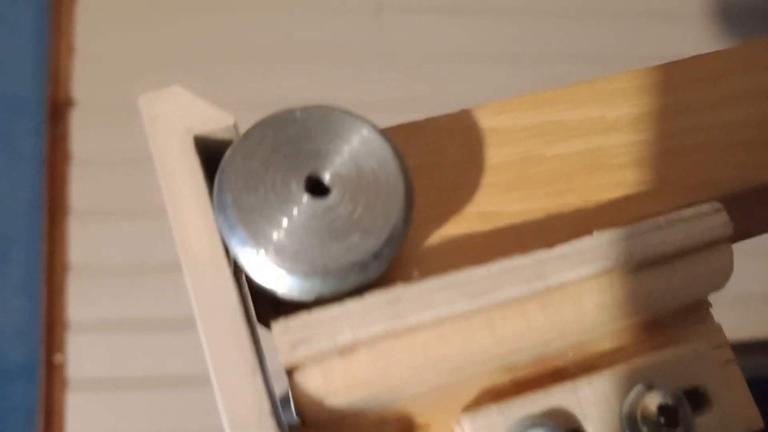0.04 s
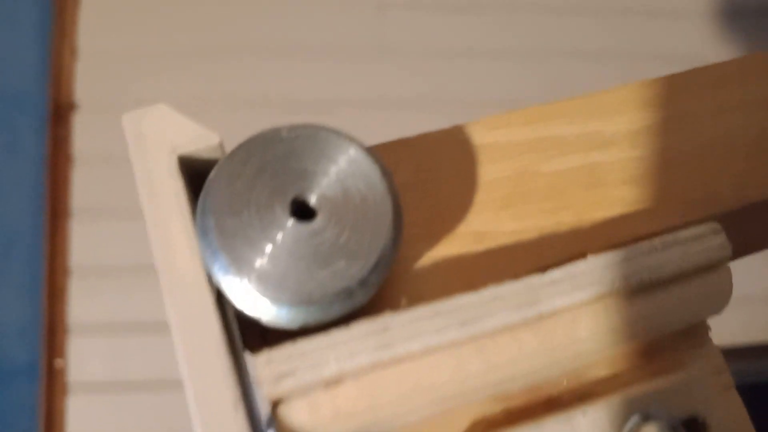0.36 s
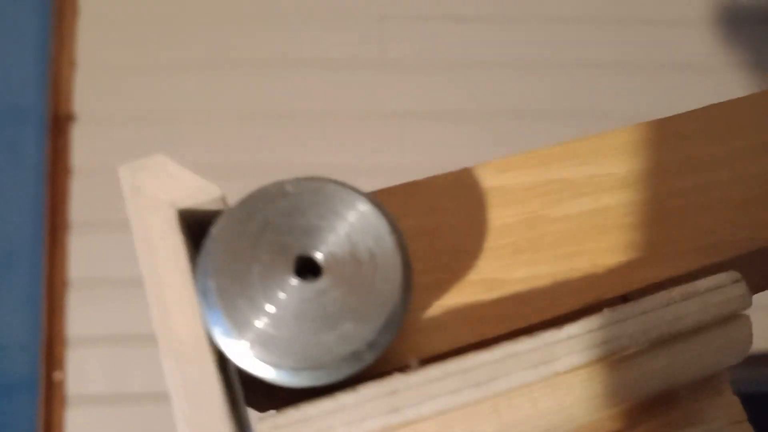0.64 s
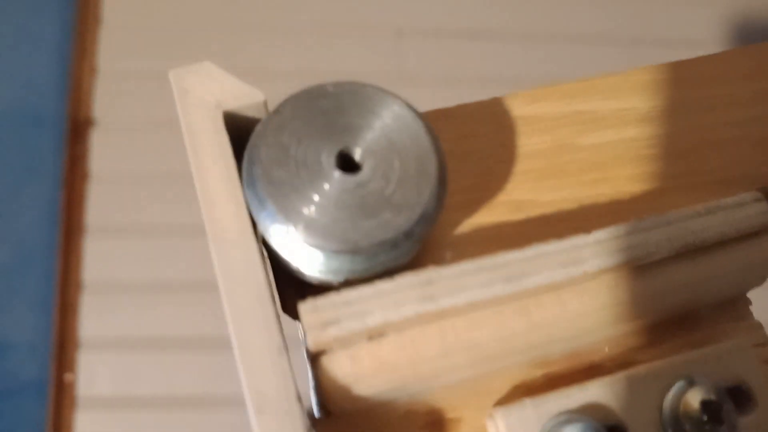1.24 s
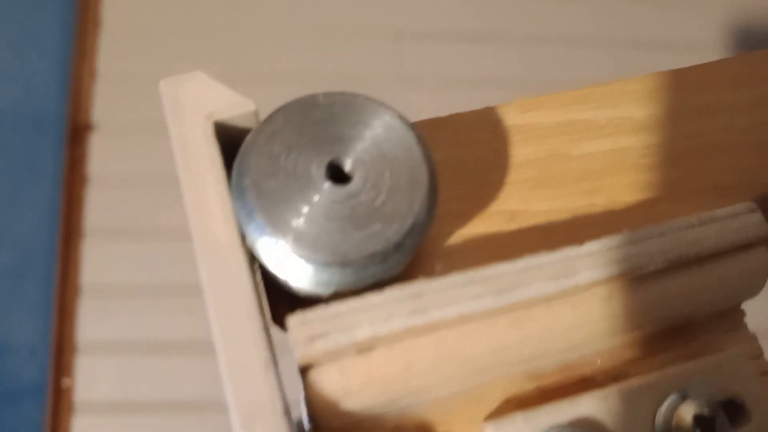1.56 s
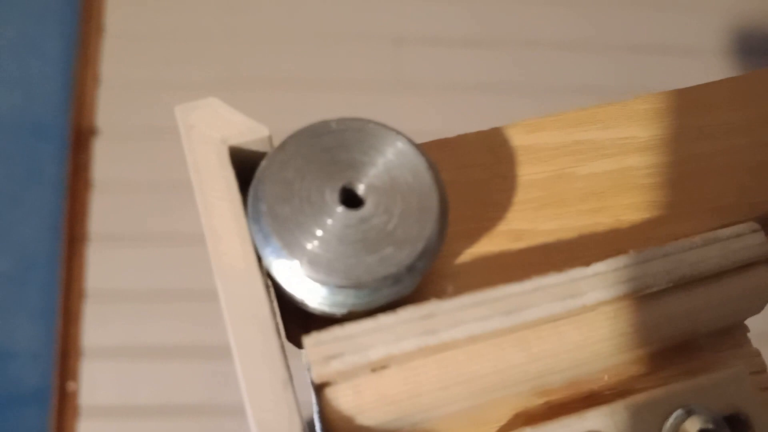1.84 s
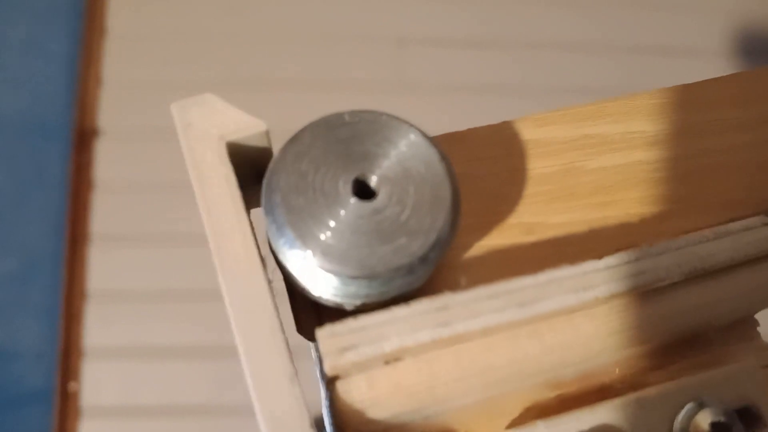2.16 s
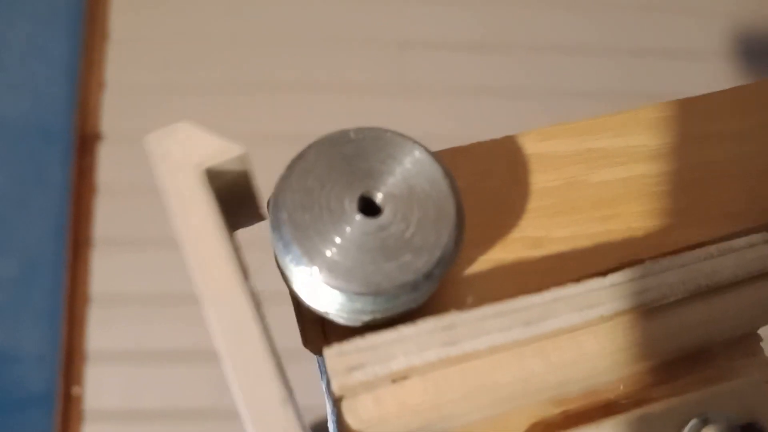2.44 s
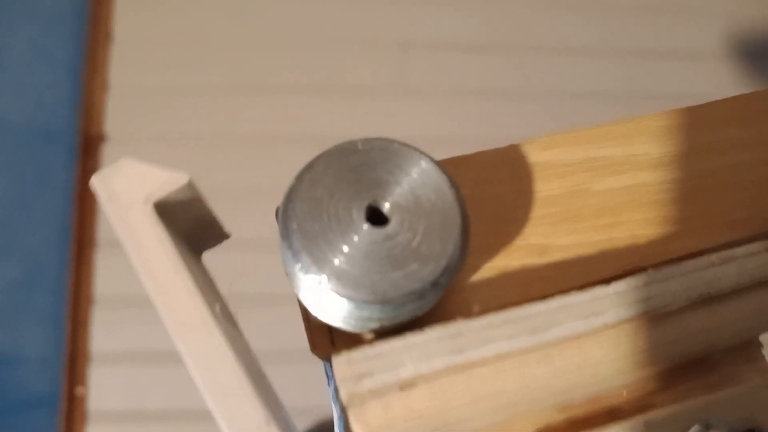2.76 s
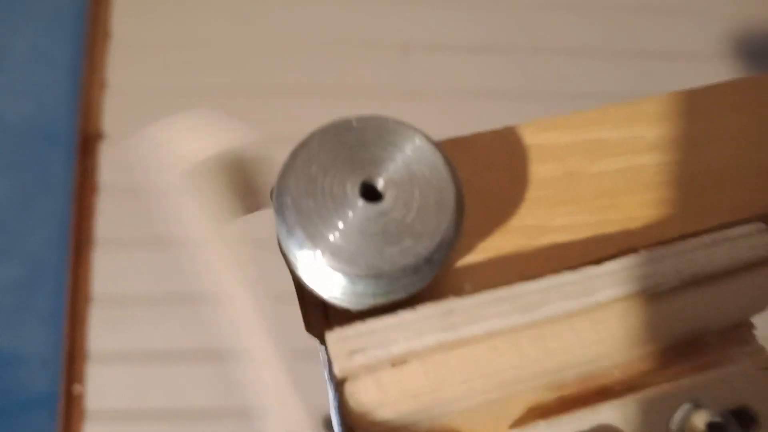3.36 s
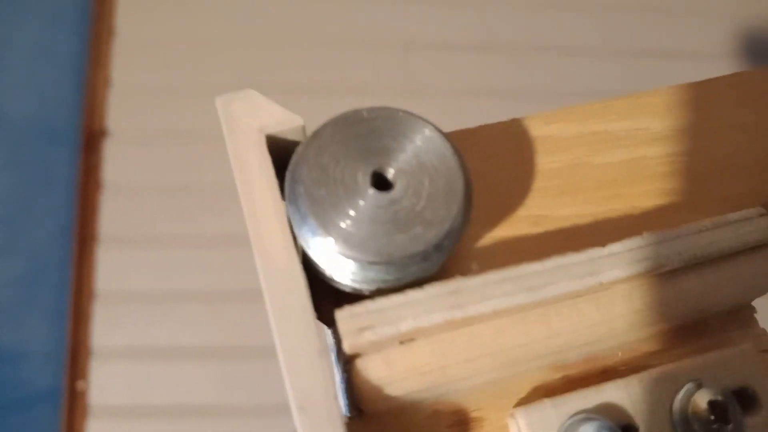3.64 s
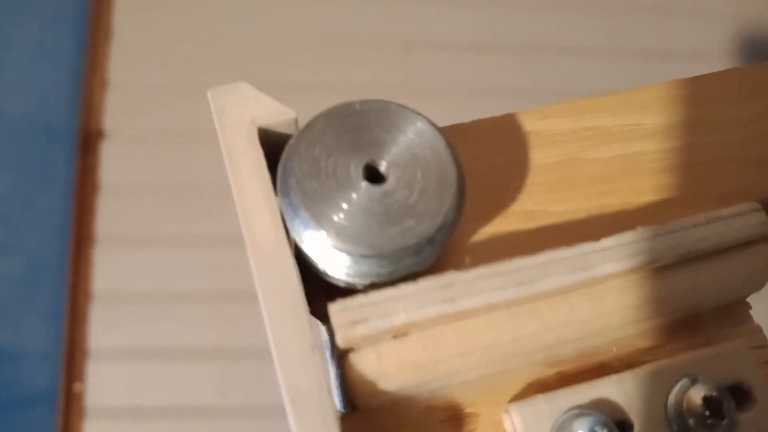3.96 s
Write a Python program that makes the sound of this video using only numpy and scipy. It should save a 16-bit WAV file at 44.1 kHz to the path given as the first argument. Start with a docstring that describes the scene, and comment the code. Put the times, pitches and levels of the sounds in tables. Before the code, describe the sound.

One sharp, close clack of a hooked wooden lever, preceded by soft bumps and tiny ticks.

```python
"""A hooked wooden lever snaps back against a small wooden mechanism, close by in a quiet room.
It grazes the frame, strikes hard and chatters to rest; lever and frame ring briefly.
Before that the catch ticks as it is eased off, with a few soft handling bumps, a rub and a rustle.
A clock ticks faintly once a second across the room, over a low rush and hiss."""
import sys
import numpy as np
from scipy import signal
from scipy.fft import rfft, irfft
from scipy.io import wavfile

SR = 44100
rng = np.random.default_rng(int(sys.argv[2]) if len(sys.argv) > 2 else 0)


def store_wav(level_fs):
    """Save 16-bit WAV to argv[1]."""
    pcm = np.round(np.clip(np.atleast_2d(level_fs), -1, 1) * 32767)
    wavfile.write(sys.argv[1], SR, pcm.T.astype(np.int16))


N = 4 * SR


def lever():
    """Each contact gives a pitched snap and a bright crack, rings the lever and shakes the frame."""
    # Lever contacts: start_s, snap_db, snap_hz, push_db
    contacts = [(3.3924, -45.5, 4460, -40), (3.4127, -45.5, 6200, -34), (3.4247, -36, 2600, -18),
                (3.4268, -30.5, 6400, -25.5), (3.4279, -25, 6390, -30.5), (3.4330, -37, 6200, -35),
                (3.4361, -19.5, 4470, -23), (3.4437, -8, 5900, -14.5), (3.445, -14.5, 5900, -23),
                (3.4488, -14, 8290, -19.5), (3.4633, -25.5, 6340, -17.5), (3.4809, -27, 5860, -26.5),
                (3.4823, -27.5, 3400, -31), (3.4973, -34.5, 3400, -27.5)]
    # Lever modes: pitch_hz, level_db, t60_s
    modes = [(2986, -24.5, 0.031), (3730, -37, .025), (4043, -15, .025), (4900, -25, 0.021),
             (5900, -16.5, .028), (6320, -14.5, .02), (6700, -22, .035), (8505, -19.5, .02)]
    start_s, snap_db, snap_hz, push_db = np.transpose(contacts)
    return_s = .00087  # the shock runs along the lever and comes back inverted
    snaps = sum(ring(clicks(at_s, db) - clicks(at_s + return_s, db), hz, t60_s=.0039)
                for at_s, db, hz, _ in contacts)
    arm = cut(snaps + struck_modes(start_s, snap_db, modes), 2200, "high")
    arm = cut(arm, 8260, "low", order=4)
    return arm + crack(start_s, snap_db, snap_hz) + frame(start_s, push_db)


def crack(start_s, snap_db, snap_hz):
    """A burst of treble noise per contact; harder, higher contacts crack more."""
    t60_s, db_per_octave = .005, 20.5
    t = np.arange(SR // 20) / SR
    burst = cut(rng.standard_normal(len(t)) * decay(t, t60_s), 10400, "high")
    level_db = snap_db - 27.5 + db_per_octave * np.log2(snap_hz / 5200)
    return signal.fftconvolve(clicks(start_s, level_db), burst)[:N]


def frame(start_s, push_db):
    """The frame answers each push with its low modes and a dense after-ring."""
    # Frame modes: pitch_hz, level_db, t60_s
    modes = [(156, -40.5, 0.079), (512, -47, 0.11), (887, -35.5, .15), (1055, -36.5, 0.089),
             (1590, -36.5, .16), (1810, -36, .07), (2000, -39, .11), (2110, -38, .1)]
    # After-ring spectrum of frame and room: freq_hz, density_db
    spectrum = [(50, -38), (110, -14.5), (180, -10.5), (380, -18.5), (700, -15), (950, -4.5), (1350, -16),
                (1850, 2), (2450, -8), (2900, -7.5), (3300, -4.5), (3950, 0.5), (4600, -11.5), (5300, -6.5),
                (6500, -1), (7500, -10.5), (8700, -7), (10000, -20), (12000, -25), (16000, -32)]
    # After-ring decay: freq_hz, t60_s
    decays = [(150, 0.24), (1000, .19), (2000, .16), (4000, 0.11), (8000, .125)]
    after_ring = diffuse(clicks(start_s, push_db), spectrum, decays, build_s=.003)
    return cut(struck_modes(start_s, push_db, modes), 160, "high") + from_db(5.5) * after_ring


def catch():
    """The hook slips on its catch in tiny woody ticks, each nudging the frame."""
    # Slips of the hook: start_s, level_db, pitch_hz, t60_s
    slips = [(.2850, -54, 6500, .004), (.5345, -57, 2880, .03), (2.1302, -48, 6400, .004),
             (2.1325, -34, 5600, 0.0047), (2.5870, -54, 5600, .004), (3.1535, -53, 6000, .004)]
    start_s, level_db, _, _ = np.transpose(slips)
    ticks = sum(ring(clicks(at_s, db), hz, t60_s) for at_s, db, hz, t60_s in slips)
    ticks = cut(cut(ticks, 3100, "high"), 8600, "low")
    wood = ring(clicks(start_s, level_db - 18), hz=1500, t60_s=.0044)
    return ticks + wood + frame(start_s, level_db - 5.5)


def handling():
    """Dull thuds topped by light knocks, a faint hollow rub and a rustle as the grip settles."""
    # Soft bumps: start_s, thud_db, knock_db
    bumps = [(0.037, -49, -66), (.281, -47, -59.5), (.835, -45, -57.5), (.942, -47.5, -50.5),
             (1.006, -49, -63), (1.365, -54, -54), (2.262, -60, -54)]
    # Knock modes: pitch_hz, level_db, t60_s
    knock_modes = [(440, -1.5, .012), (850, -1, 0.0076), (1740, -3, 0.0074)]
    # Rub envelope: time_s, level_db
    rub_levels = [(0, -63), (.04, -67), (.085, -65), (.14, -88)]
    # Rustle envelope: time_s, level_db
    rustle_levels = [(0, -82), (.3, -75.5), (.8, -74.5), (1.3, -83), (4, -78.5)]
    # Rustle spectrum: freq_hz, density_db
    rustle_spectrum = [(800, -26.5), (2800, 0.5), (6500, -3.5), (10000, -16)]
    start_s, thud_db, knock_db = np.transpose(bumps)
    thuds = ring(clicks(start_s, thud_db), hz=134, t60_s=.03)
    knocks = struck_modes(start_s, knock_db, knock_modes)
    rub = envelope(rub_levels) * pitched_noise(hz=563, t60_s=.023)
    rustle = envelope(rustle_levels) * noise(rustle_spectrum, N)
    return cut(thuds + knocks + rub, 47, "high") + rustle


def clock():
    """Far ticks: a faint direct click, then its smear in the room."""
    # Clock ticks: start_s, level_db
    beats = [(.0335, -33), (1.0288, -32), (2.0335, -34), (3.0292, -32.5)]
    # Tick spectrum in the room: freq_hz, density_db
    spectrum = [(300, -9), (550, 5.5), (900, -13), (1800, 1.5), (2700, -4), (4500, -7.5), (5800, 3),
                (6800, -2.5), (8300, -20), (15000, -30)]
    room_t60_s = .21
    ticks = clicks(*np.transpose(beats))
    direct = from_db(-23.5) * ring(ticks, hz=5900, t60_s=.0092)
    return direct + diffuse(ticks, spectrum, [(1000, room_t60_s)], build_s=.00078)


def room_tone():
    """Steady low rush and hiss with two thin whistles."""
    # Rush and hiss: freq_hz, density_db
    spectrum = [(20, -32), (35, -17), (55, -6.5), (80, 0), (130, -1), (250, -3.5), (500, -8.5), (1000, -12),
                (1550, -13), (1900, -14), (2300, -16.5), (4000, -19), (6500, -19.5), (8500, -22),
                (15500, -22.5)]
    # Whistles: pitch_hz, width_hz, level_db
    bands = [(1885, 140, -79.5), (7610, 80, -83)]
    whistles = sum(from_db(db) * pitched_noise(hz, t60_s=np.log(1000) / (np.pi * width_hz))
                   for hz, width_hz, db in bands)
    return from_db(-64) * noise(spectrum, N) + whistles


def struck_modes(start_s, push_db, modes, spread_db=3.5):
    """Each push rings every mode with a random strength of its own."""
    scatter_db = spread_db * rng.standard_normal((len(start_s), len(modes)))
    return sum(ring(clicks(start_s, push_db + mode_db + scatter_db[:, k]), hz, t60_s)
               for k, (hz, mode_db, t60_s) in enumerate(modes))


def diffuse(x, spectrum, decays, build_s):
    """Pass x through a dense response that builds up, then dies away octave by octave."""
    size = SR // 2
    t = np.arange(size) / SR
    bins = rfft(noise(spectrum, size))
    freq_hz = np.arange(len(bins)) * SR / size
    octave = np.round(np.log2(np.maximum(freq_hz, 64)))
    tail = sum(irfft(bins * (octave == k), size) * decay(t, at_hz(decays, 2 ** k))
               for k in np.unique(octave))
    response = rms_one(tail * (1 - np.exp(-t / build_s))) / np.sqrt(size)
    return signal.fftconvolve(x, response)[:N]


def ring(x, hz, t60_s):
    """Resonator: a unit click starts a decaying sine of height 1."""
    radius, angle = decay(1 / SR, t60_s), 2 * np.pi * hz / SR
    return signal.lfilter([0, np.sin(angle)], [1, -2 * radius * np.cos(angle), radius ** 2], x + 1e-18)


def clicks(start_s, level_db):
    """One impulse at each start."""
    impulses = np.zeros(N)
    np.add.at(impulses, np.round(np.asarray(start_s) * SR).astype(int), from_db(level_db))
    return impulses


def noise(spectrum, size):
    """Noise of a given spectrum, rms 1."""
    white = rfft(rng.standard_normal(size))
    freq_hz = np.arange(len(white)) * SR / size
    return rms_one(irfft(white * from_db(at_hz(spectrum, freq_hz)), size))


def pitched_noise(hz, t60_s):
    """Noise through one resonance, rms 1."""
    return rms_one(ring(rng.standard_normal(N), hz, t60_s))


def envelope(levels):
    """A level curve as gain over time, silent after its end."""
    return from_db(np.interp(np.arange(N) / SR, *np.transpose(levels), right=-np.inf))


def decay(t, t60_s):
    """Gain falling 60 dB every t60_s."""
    return from_db(-60 * t / t60_s)


def cut(x, hz, kind, order=2):
    """Butterworth low- or high-pass."""
    return signal.sosfilt(signal.butter(order, hz, kind, fs=SR, output="sos"), x + 1e-18)


def at_hz(points, hz):
    """Read a table on a log-frequency axis."""
    freq_hz, values = np.transpose(points)
    return np.interp(np.log(hz + 1e-9), np.log(freq_hz), values)


def from_db(db):
    """Decibels to gain."""
    return 10 ** (np.asarray(db) / 20)


def rms_one(x):
    """Scale to unit rms."""
    return x / np.sqrt(np.mean(x ** 2) + 1e-20)


def scene():
    """All sources in one channel."""
    return (room_tone() + clock() + handling() + catch() + lever())[None]


def record(dry):
    """Steep elliptic low-pass."""
    cutoff_hz = 15800
    return signal.sosfilt(signal.ellip(10, .1, 70, cutoff_hz, fs=SR, output="sos"), dry)


dry = scene()
out = record(dry)
store_wav(out)
```